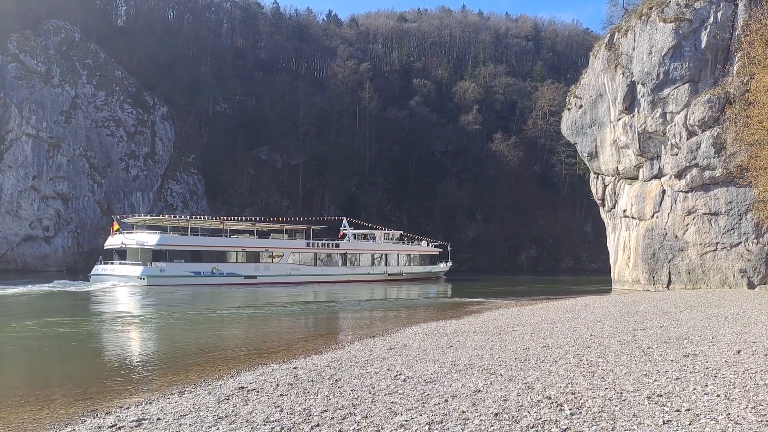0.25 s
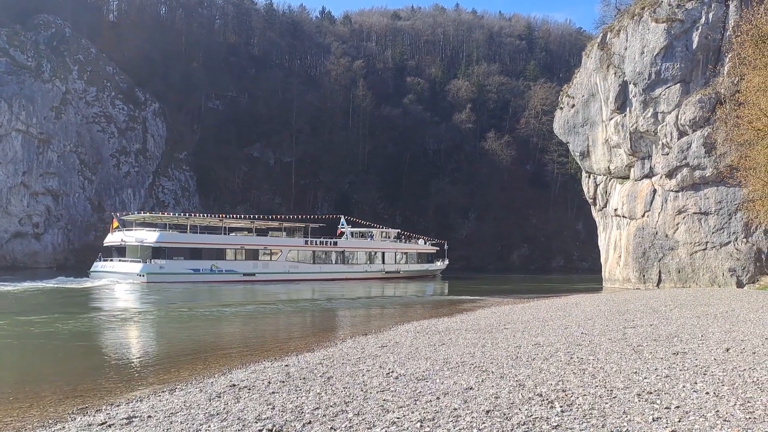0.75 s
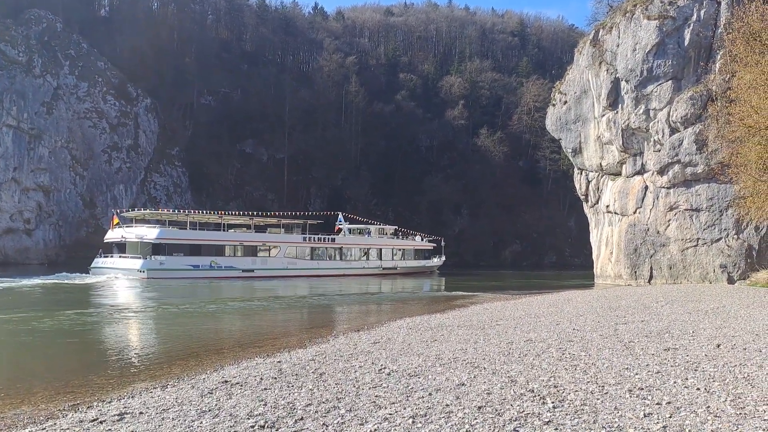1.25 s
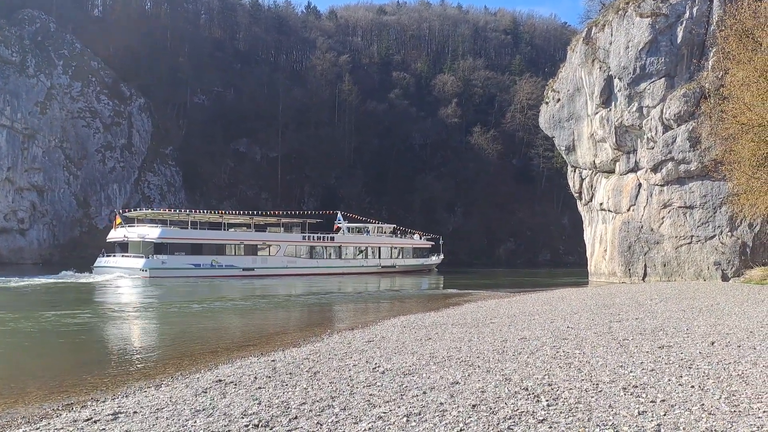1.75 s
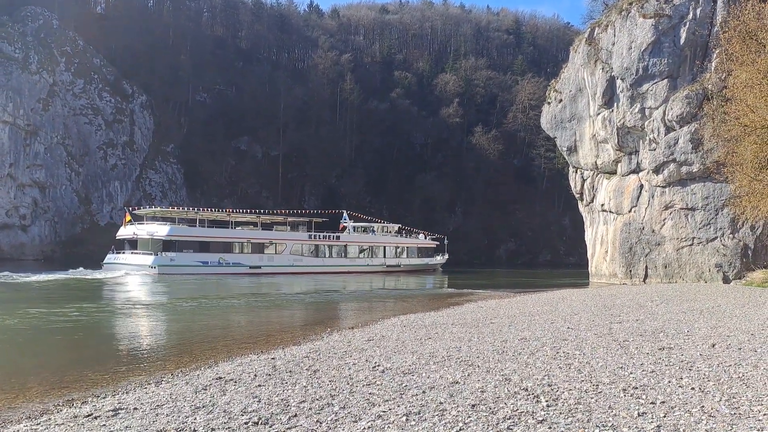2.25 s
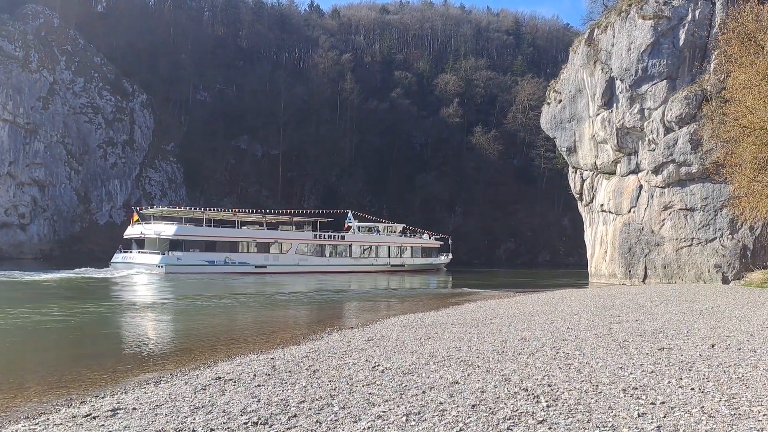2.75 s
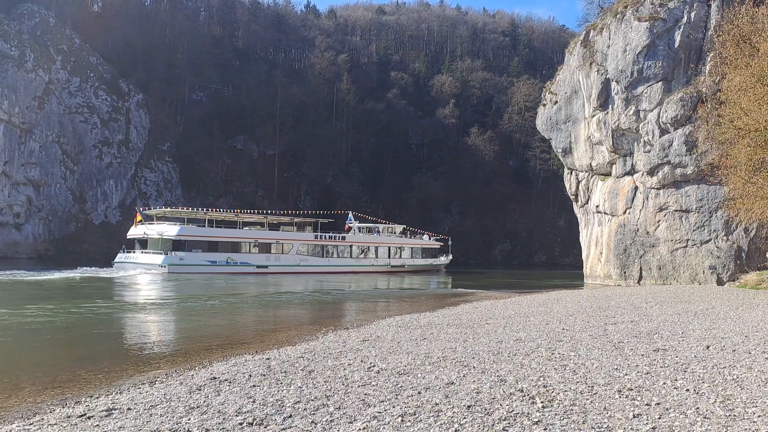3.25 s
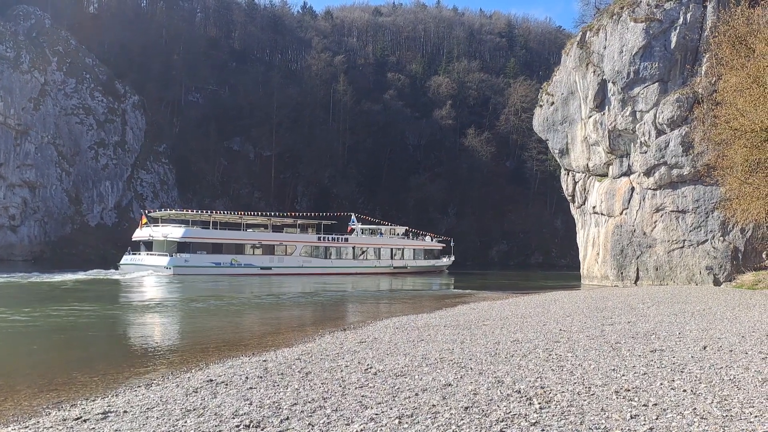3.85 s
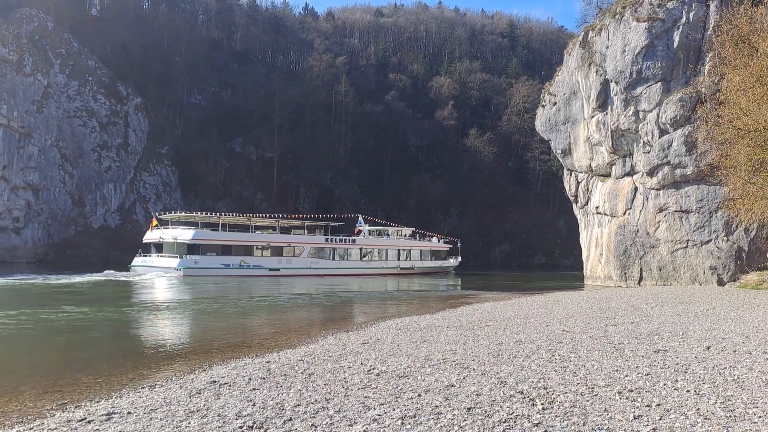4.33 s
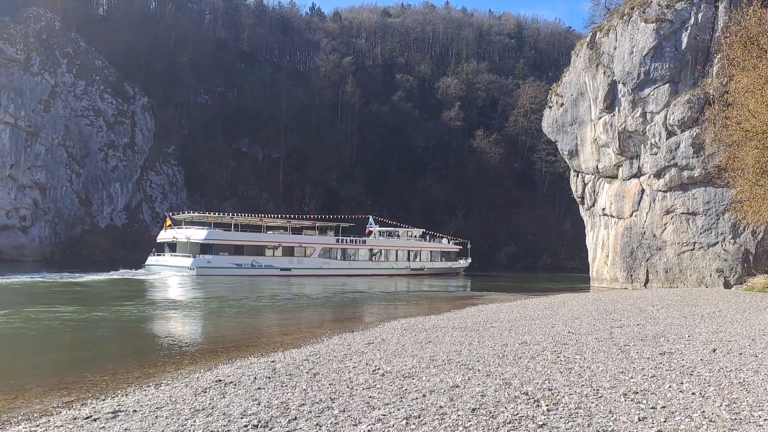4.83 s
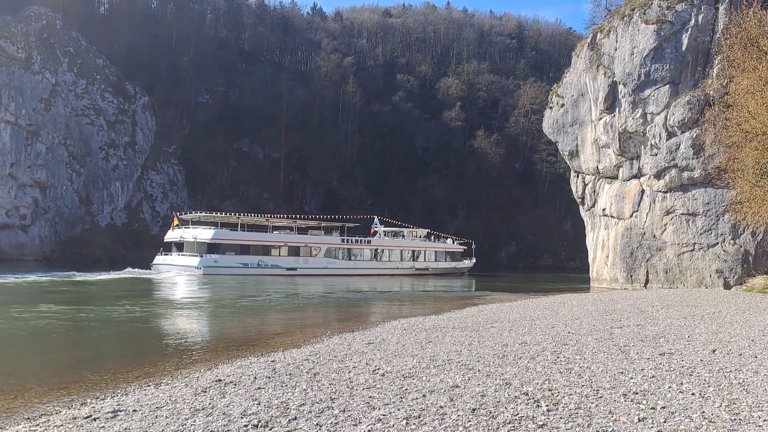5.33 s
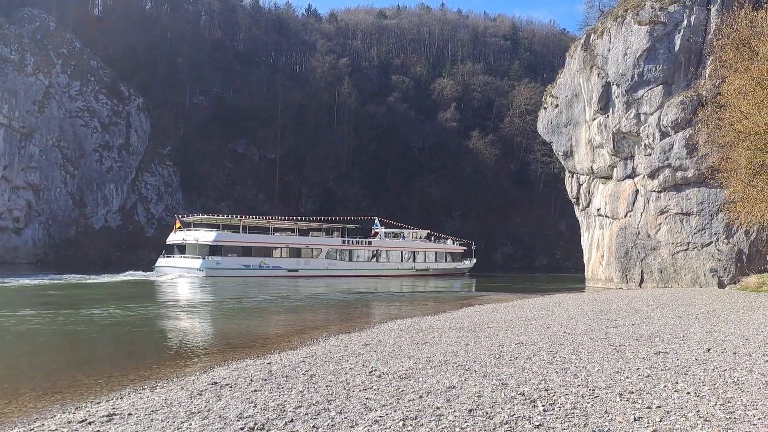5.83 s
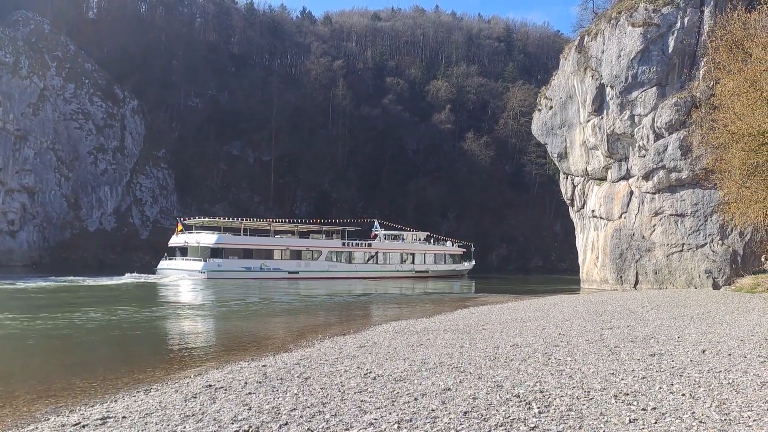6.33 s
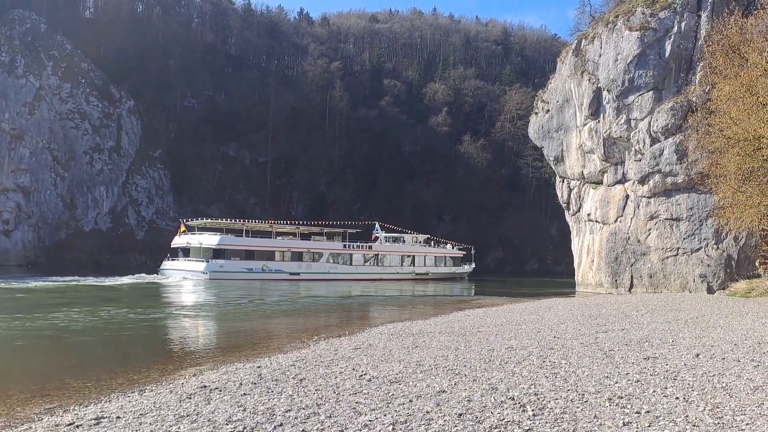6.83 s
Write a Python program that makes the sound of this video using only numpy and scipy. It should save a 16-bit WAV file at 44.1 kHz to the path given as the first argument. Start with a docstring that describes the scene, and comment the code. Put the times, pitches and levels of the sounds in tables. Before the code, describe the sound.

A passenger boat's diesel engines throb low and steady out on a river, over the even rush of propeller wash, heard in stereo from a gravel bank. Close by, stones crunch and click faintly, mostly in the first second. Small birds give thin, high whistles and buzzes, then short chirps, echoing softly off cliffs. The throb grows a little stronger in the second half. A breeze puffs on the microphone over a faint high hiss.

```python
"""A passenger boat's diesels throb along a river gorge, heard in stereo from a gravel bank.
Main engine and generator fire at different rates and beat against each other, straight ahead out on
the water, over the rush of the propeller wash. Small birds call from the wooded cliffs, which echo
them. Close to the microphone, gravel crunches faintly as its stones rub and knock together,
and a breeze puffs. A thin, high hiss lies in the background."""
import sys
import numpy as np
from scipy import signal
from scipy.fft import rfft, irfft
from scipy.io import wavfile

SR = 44100
rng = np.random.default_rng(int(sys.argv[2]) if len(sys.argv) > 2 else 0)


def bounce(signal):
    """Save signal as a 16-bit WAV file at the path given by the first command-line argument."""
    frames = np.transpose(np.atleast_2d(signal))
    limited = np.clip(frames, -1, 1)
    pcm = np.round(limited * 32767).astype(np.int16)
    wavfile.write(sys.argv[1], SR, pcm)


N = 312159
T = np.arange(N) / SR
FREQS = np.maximum(np.arange(N // 2 + 1) * SR / N, 1)


# The main diesel's speed. Each row: time in seconds, firing rate in Hz.
MAIN_SPEED = [(0, 55.2), (1, 55.75), (2, 55.75), (3.2, 55.55), (3.8, 56), (5.2, 56), (5.8, 55.8),
              (7.08, 55.8)]
# The exhausts from the bank. Each row: time in seconds, main diesel and generator levels in dB.
EXHAUST = [(0, -35.5, -34.0), (0.12, -34.5, -31.5), (0.28, -48.0, -32.6), (0.5, -43.0, -30.6),
           (0.8, -36.5, -32.0), (1.1, -36.3, -31.0), (1.55, -32.2, -30.5), (2.3, -34.5, -31.8),
           (3.2, -36.3, -32.8), (3.75, -30.0, -32.5), (4.7, -26.7, -33.0), (5.4, -29.0, -34.0),
           (6.0, -29.8, -33.5), (6.75, -26.9, -31.8), (7.08, -28.0, -33.0)]
# Their overtones. Each row: multiple of the firing rate, level in dB, depth of fading in dB.
MAIN_OVERTONES = [(2.5, -59, 2), (3, -50.3, 1.2), (4, -62, 0.5)]
GENERATOR_OVERTONES = [(2, -61, 3.1), (3, -63.5, 2.1)]
# A hum an octave above the main diesel, across the water. Each row: time in seconds, level in dB.
OCTAVE_HUM = [(0, -41), (.3, -45), (.6, -45), (1.05, -49.5), (1.35, -44), (1.85, -52), (2.1, -44),
              (2.5, -42.5), (2.85, -46), (3.3, -57), (3.9, -46), (4.4, -42), (5.03, -55), (5.25, -46),
              (5.7, -42.5), (6.12, -57), (6.55, -44.5), (7.08, -44)]
# Low rumble of hull and exhaust. Each row: time in seconds, level in dB.
RUMBLE = [(0, -41.5), (1.4, -43.5), (2.8, -42), (4.5, -45.5), (5.4, -40), (6.2, -43), (7.08, -36.5)]
# Its colour at the bank. Each row: frequency in Hz, relative level in dB.
RUMBLE_COLOUR = [(15, -31), (28, -6), (42, -3.5), (60, -0.5), (90, -0.5), (125, -5.5), (190, -8), (245, -7),
                 (330, -14.5), (600, -73)]

def engines(generator_hz=75.02, machine_hz=87.7, machine_db=-52, surge_db=1.3):
    """Out on the river, main diesel and generator beat about 19 times a second over a dull rumble."""
    main_db, generator_db = np.array(curves(EXHAUST)) - dips()
    main_hz = curves(MAIN_SPEED)[0]
    main = diesel(main_hz, main_db, MAIN_OVERTONES, flutter_db=1.1, wander_rad=0.09)
    generator = diesel(np.full(N, generator_hz), generator_db, GENERATOR_OVERTONES,
                       flutter_db=0.2, wander_rad=0.02)
    octave = hum(2 * main_hz, curves(OCTAVE_HUM)[0])
    machinery = hum(np.full(N, machine_hz), machine_db)
    rumble = from_river(RUMBLE_COLOUR) * undb(curves(RUMBLE)[0] + surge_db * walk(2.6))
    return main + generator + dip_bass(octave + machinery + rumble)


def diesel(hz, firing_db, overtones, flutter_db, wander_rad):
    """A muffled exhaust: a strong tone at the firing rate, with weak overtones fading over the water."""
    phase = 2 * np.pi * np.cumsum(hz) / SR
    out = undb(firing_db + flutter_db * walk(23)) * np.cos(phase + wander_rad * walk(5.2))
    for multiple, db, fading_db in overtones:
        drift = 0.044 * walk(6.2) + rng.uniform(0, 2 * np.pi)
        out += undb(db + fading_db * walk(3.4)) * np.cos(multiple * phase + drift)
    return np.sqrt(2) * out


def hum(hz, db):
    """One clean tone from on board, following a pitch curve."""
    return np.sqrt(2) * undb(db) * np.sin(2 * np.pi * np.cumsum(hz) / SR)


# The throb dips briefly at the microphone.
# Each row: centre and half width in seconds, main diesel and generator dips in dB.
DIPS = [(0.2, 0.018, 11.0, 20.0), (0.64, 0.012, 3.0, 11.0), (0.838, 0.012, 9.0, 18.0),
        (0.938, 0.018, 7.0, 10.0), (2.36, 0.016, 6.0, 10.0), (2.79, 0.018, 6.0, 1.5),
        (2.92, 0.018, 5.0, 3.0), (3.1, 0.022, 17.0, 3.5), (3.32, 0.025, 5.0, 3.0), (5.17, 0.04, 8.5, 6.0),
        (5.27, 0.014, 4.0, 2.0), (5.725, 0.018, 7.0, 7.0), (5.845, 0.016, 3.5, 1.0),
        (6.385, 0.015, 4.5, 2.5), (7.02, 0.018, 4.5, 4.0)]

def dips():
    """How far the main diesel and the generator have dipped, in dB, at each moment."""
    return sum(np.outer(depths_db, bump(s, half_width)) for s, half_width, *depths_db in DIPS)


# The bass that dips with the throb. Each row: frequency in Hz, gain in dB.
DIPPING_BASS = [(110, 0), (160, -8), (260, -40)]

def dip_bass(x):
    """The deep part of a sound sinks whenever the throb dips."""
    lost = 1 - undb(-dips().mean(axis=0))
    return x - tint(x, DIPPING_BASS) * lost


# Swells in the boat's drone. Each row: start and length in seconds, pitch in Hz, peak level in dB.
SWELLS = [(0.072, 0.072, 249, -41), (0.687, 0.16, 225, -40), (1.07, 0.085, 160, -41),
          (3.46, 0.14, 221, -42.5), (3.996, 0.12, 212, -41), (5.32, 0.09, 240, -44),
          (5.4, 0.11, 284, -42.5), (5.55, 0.1, 226, -43.5)]

def swells():
    """The drone rises softly on one low note at a time, midway between left and right."""
    out = np.zeros((2, N))
    for s, length, hz, db in SWELLS:
        shape = arch(length)
        add(out, s, undb(db) * shape * np.sin(2 * np.pi * hz * T[:len(shape)]))
    return out


# The wash from the bank. Each row: time in seconds, relative levels of churn and spray in dB.
WASH = [(0, -41.5, -57), (.7, -42.5, -54), (1.5, -42.5, -56), (2.5, -43.5, -57), (3.6, -43.5, -57.5),
        (4.3, -42.5, -57.5), (5.2, -44, -55.5), (6.2, -44, -57.5), (7.08, -44.5, -57.5)]
# Their colours. Each row: frequency in Hz, relative level in dB.
CHURN_COLOUR = [(100, -2.5), (250, -3.5), (320, -2.5), (420, 1), (600, 2.5), (780, -2), (950, -1.5),
                (1200, -4.5), (1550, -6.5), (2000, -13), (3000, -56), (6000, -66)]
SPRAY_COLOUR = [(1200, -17), (2000, 8.5), (2500, 7), (3200, 4.5), (3900, -2), (4600, -6.5), (6000, -13),
                (7400, -8.5), (9000, -44), (12000, -27.5), (16000, -42)]

def wash(churn_gain_db=2.5, spray_gain_db=6.0):
    """The propeller churns water astern, with brighter spray on top; each part surges on its own."""
    churn_db, spray_db = curves(WASH)
    churn = from_river(CHURN_COLOUR) * undb(churn_db + churn_gain_db + 1.17 * walk(31))
    spray = from_river(SPRAY_COLOUR) * undb(spray_db + spray_gain_db + 1.24 * walk(22))
    return churn + spray


# How alike the river is on both sides of the microphone. Each row: frequency in Hz, coherence 0 to 1.
RIVER_COHERENCE = [(50, 0.38), (150, 0.98), (550, 0.94), (1000, 0.77), (1700, 0.4), (3000, 1), (4300, 0.08),
                   (6000, 0), (8000, 0.56), (15000, 0)]
# The river's balance. Each row: frequency in Hz, left minus right in dB.
RIVER_PAN = [(400, 0.1), (1300, -1), (2400, -1.5), (3200, -4), (4200, -1), (5700, 11.5), (7500, 0),
             (10000, -8), (12500, 21), (15500, 0)]

def from_river(colour, lag_s=0.00013):
    """Boat noise: the direct part reaches the left first, the cliffs return the rest from all sides."""
    source, left, right = rfft(rng.standard_normal((3, N)))
    share = np.clip(across(RIVER_COHERENCE), 0, 1)
    direct = np.array([source, source * np.exp(-2j * np.pi * FREQS * lag_s)])
    both = np.sqrt(share) * direct + np.sqrt(1 - share) * np.array([left, right])
    balance = undb(np.outer([1, -1], across(RIVER_PAN)) / 2)
    return unit(irfft(both * balance * undb(across(colour)), N))


def birds():
    """Birds on the wooded cliffs whistle, buzz and chirp, all heard through the gorge."""
    perched = gorge(whistles() + buzzes(), direct_db=-2, branch_db=-8)
    chirping = gorge(chirps(), direct_db=-1.5, branch_db=-7)
    return perched + chirping


# Whistles from open perches. Each row: start and length in seconds, first and last pitch in Hz,
# relative level in dB, left minus right in dB.
WHISTLES = [(1.166, 0.38, 8660, 7450, -67, 0), (1.44, 0.39, 9550, 7830, -65, 3),
            (3.473, 0.26, 9050, 7850, -62, 3), (4.95, 0.3, 9200, 7820, -68, 7),
            (6.615, 0.26, 9100, 8050, -65, 7)]

def whistles(bend=1.6):
    """Long, thin whistles that flutter and almost break as they sink."""
    out = np.zeros((2, N))
    quaver_hz = 28 * walk(146)
    flutter = unit(undb(4.5 * np.minimum(walk(70), 1)))
    for s, length, start_hz, end_hz, db, side_db in WHISTLES:
        call = note(s, length, start_hz, end_hz, 0, bend, quaver_hz, flutter)
        add(out, s, undb(db) * call * pan(side_db))
    return out


# Buzzy calls, a little to the left.
# Each row: start and length in seconds, band centre and width in Hz, relative level in dB.
BUZZES = [(0.56, 0.16, 6900, 900, -65), (1.549, 0.08, 7240, 500, -54.5), (1.55, .12, 9500, 3000, -72),
          (2.425, 0.11, 7250, 500, -56), (2.432, 0.11, 8460, 2800, -59.5), (2.46, 0.13, 4420, 220, -59),
          (3.34, 0.18, 7750, 600, -62.5), (3.55, 0.091, 7850, 500, -62), (3.66, 0.096, 7850, 800, -56.5),
          (3.798, 0.071, 7830, 600, -59), (3.828, 0.22, 8040, 800, -65), (5.2, .28, 13400, 1000, -67),
          (5.93, .1, 9200, 3200, -71)]

def buzzes(flicker_db=3.5):
    """Narrow, rasping bands of birdsong whose level flickers."""
    out, rasp = np.zeros((2, N)), rfft(rng.standard_normal(N))
    for s, length, hz, width, db in BUZZES:
        shape = arch(length)
        band = unit(irfft(rasp / (1 + (2 * (FREQS - hz) / width) ** 2), N))
        call = shape * np.roll(band, -int(s * SR))[:len(shape)]
        add(out, s, undb(db) * call * pan(1.6))
    return out * undb(flicker_db * walk(25))


# Short chirps from the trees. Each row: start and length in seconds, first and last pitch in Hz, relative level
# and swell up to it in dB, bend (1 is a straight slide), left minus right in dB.
CHIRPS = [(4.072, 0.05, 4200, 3500, -56.5, 4, 2.2, 4), (4.13, 0.14, 4200, 4300, -62, 3, 1.5, 10),
          (4.272, 0.06, 6650, 6380, -63.5, 0, 2.5, 4), (4.374, 0.038, 6400, 5280, -53.5, 8, 3.2, 8),
          (4.41, 0.095, 5320, 5330, -66, 0, 1, 4), (4.452, 0.042, 4700, 3880, -54.5, 7, 2.2, 13),
          (4.507, 0.038, 4150, 3180, -48.5, 5, 1.7, 0), (4.88, 0.034, 5900, 4380, -58, 6, 1.6, 5),
          (4.945, 0.04, 4450, 4080, -59, 2, 2, 5), (5.175, 0.055, 3380, 3290, -54.5, 2, 2, 5),
          (5.25, 0.036, 3920, 3960, -53, 2, 2, 2), (5.39, 0.09, 3050, 2900, -55.5, 4, 1.7, 6),
          (5.555, 0.13, 3700, 4380, -54, 13, 1.9, 10), (5.945, 0.032, 4600, 4380, -59, 2, 2, 3),
          (5.988, 0.03, 4050, 3780, -62, 0, 1.5, 8), (6.644, 0.032, 5300, 3720, -52, 5, 1.9, 6),
          (6.817, 0.044, 4300, 3720, -52, 3, 2, 7)]

def chirps():
    """Short, slightly hoarse notes, most of them hooked downwards."""
    out = np.zeros((2, N))
    quaver_hz = 30 * walk(300)
    flutter = unit(undb(2.0 * np.minimum(walk(150), 1)))
    for s, length, start_hz, end_hz, db, swell_db, bend, side_db in CHIRPS:
        call = note(s, length, start_hz, end_hz, swell_db, bend, quaver_hz, flutter)
        add(out, s, undb(db) * call * pan(side_db))
    return out


def note(s, length, start_hz, end_hz, swell_db, bend, quaver_hz, flutter):
    """One bird note slides to its last pitch, swelling by swell_db on the way."""
    shape = arch(length)
    span = slice(int(s * SR), int(s * SR) + len(shape))
    remaining = np.linspace(1, 0, len(shape))
    hz = end_hz + (start_hz - end_hz) * remaining ** bend + quaver_hz[span]
    envelope = shape * flutter[span] * undb(-swell_db * remaining)
    return np.sqrt(2) * envelope * np.sin(2 * np.pi * np.cumsum(hz) / SR)


def gorge(x, direct_db, branch_db, blur_s=0.007, echo_s=0.075, smear_s=0.02, t60_s=0.81):
    """Branches blur a call at once, the cliff returns a smeared echo, and a soft stereo tail follows."""
    age = T[:SR]
    tail = rng.standard_normal((2, SR)) * np.exp(-np.log(1000) * age / t60_s)
    tail *= 1 - np.exp(-age / 0.0063)
    echo = rng.standard_normal((2, SR)) * (age > echo_s) * np.exp(-abs(age - echo_s) / smear_s)
    branches = stereo_noise(0.5, SR) * np.exp(-age / blur_s)
    response = undb(branch_db) * unit(branches) + undb(-10) * unit(echo) + undb(-6) * unit(tail)
    return undb(direct_db) * x + signal.fftconvolve(x, response / np.sqrt(SR), axes=1)[:, :N]


# Stones grinding under weight, close by. Each row: time in seconds, level in dB.
GRIND = [(0, -59), (.55, -61), (.66, -56.5), (.78, -57), (.865, -55), (.92, -59), (1.0, -57.5), (1.1, -60),
         (1.35, -58.5), (1.9, -62), (2.5, -64), (4, -65), (7.08, -73)]
# The bright crunch and the duller grinding. Each row: frequency in Hz, relative level in dB.
CRUNCH_COLOUR = [(1500, -12), (2500, 5), (3500, 7.5), (4700, -11), (6000, -1.5), (7600, 4), (9500, 0.5),
                 (12000, -0.5), (14000, -1), (16000, -6)]
GRIND_COLOUR = [(1800, -38), (2800, -8), (3400, 3.5), (3900, 0), (4500, -9.5), (6500, -32), (12000, -31)]

def gravel(grains_per_s=1100, rubs_per_s=420):
    """Near the microphone, to the left, tiny stone contacts crunch and clink over a duller grinding."""
    crunch = undb(-3) * unit(tint(contacts(grains_per_s) * stereo_noise(0.76), CRUNCH_COLOUR))
    clinking = undb(-1) * unit(tint(clinks(), CRUNCH_COLOUR))
    grind = unit(tint(contacts(rubs_per_s) * stereo_noise(0.19), GRIND_COLOUR))
    return ((crunch + clinking) * shifting() + grind * undb(curves(GRIND)[0])) * pan(3.5)


def contacts(per_s, decay_s=0.0034):
    """The envelope of stones touching at random, each touch dying away quickly."""
    touches = rng.random(N) < per_s / SR
    power = signal.lfilter([1], [1, -np.exp(-2 / (decay_s * SR))], touches)
    return unit(np.sqrt(power + 1e-12))


def clinks(per_s=2200, spread_db=3.0, ring_s=0.0006, pitches=28):
    """Small stones knock together at random, each ringing for an instant at its own pitch."""
    out = np.zeros((2, N))
    count = int(per_s * N / SR / pitches)
    decay = np.exp(-1 / (ring_s * SR))
    for hz in np.linspace(2000, 15500, pitches):
        sizes = undb(spread_db * np.minimum(rng.exponential(size=count), 4)) * rng.choice([-1, 1], count)
        hits = np.zeros((2, N))
        hits[:, rng.integers(0, N, count)] = sizes * (1 + 0.38 * rng.standard_normal((2, count)))
        angle = 2 * np.pi * hz / SR
        out += signal.lfilter([np.sin(angle)], [1, -2 * decay * np.cos(angle), decay ** 2], hits)
    return unit(out)


# The gravel shifts close by. Each row: start and hold in seconds, relative level in dB.
SHIFTS = [(0.567, 0.27, -57), (0.942, .02, -59), (1.478, .1, -65), (2.42, 0.096, -67), (2.656, 0.14, -65),
          (3.08, .06, -68), (3.43, 0.056, -61), (4.44, 0.22, -66), (4.68, 0.27, -63.5), (4.998, .06, -60.5),
          (5.22, 0.3, -64), (6.48, 0.26, -71)]

def shifting(attack_s=0.028, settle_s=0.14, creep_db=-63, fade_db_per_s=3.5):
    """How hard the gravel moves: each shift builds, holds and settles, over a fading creep."""
    power = undb(creep_db - fade_db_per_s * T) ** 2
    for s, hold, db in SHIFTS:
        rise = np.clip((T - s) / attack_s, 0, 1)
        settle = np.exp(-np.maximum(T - s - attack_s - hold, 0) / settle_s)
        power += (undb(db) * rise * settle) ** 2
    return np.sqrt(power)


# Single pebbles near the microphone.
# Each row: start in seconds, relative level in dB, ring in Hz, left minus right in dB.
PEBBLES = [(0.0498, -41, 7500, -3), (0.559, -41, 6540, 8), (0.614, -41, 7000, 2), (0.6743, -35, 6500, 2),
           (0.704, -42, 5600, 3), (0.714, -41, 9000, 3), (0.727, -37, 6400, 3), (0.7617, -46, 8300, 3),
           (0.816, -37, 11200, 3), (0.855, -33, 11800, 8), (0.885, -42, 6000, 3), (0.9738, -42, 8000, 3),
           (1.026, -44, 8500, 3), (1.1084, -43, 11500, 3), (2.197, -41, 6600, 1), (2.5446, -39, 10600, 10),
           (2.5915, -42, 12000, 9), (2.9562, -44, 8460, 13), (3.485, -33, 7000, 7), (3.6576, -43, 13000, 6),
           (4.209, -48, 9000, 3), (4.4598, -49, 9000, 10), (4.601, -36.5, 7550, 6), (5.9694, -42, 8000, 3),
           (6.116, -43, 9500, 3), (6.1374, -44, 12500, 4), (6.3804, -44, 13500, 5),
           (6.4622, -43, 13500, 10), (6.7601, -44, 7000, 8)]

def pebbles(decay_s=0.0011, ticks_per_s=18):
    """Now and then a pebble clicks and rings at its own pitch; small grit ticks faintly in between."""
    age, clicks = T[:800], np.zeros((2, N))
    for s, db, hz, side_db in PEBBLES:
        click = rng.standard_normal(len(age)) + 0.83 * np.sin(2 * np.pi * hz * age)
        add(clicks, s, click * np.exp(-age / decay_s) * undb(db - 10.5) * pan(side_db))
    clicks = tint(clicks, [(1500, -15), (3500, 2), (7500, 3.5), (12000, 3), (16000, 3)])
    hits = (rng.random(N) < ticks_per_s / SR) * undb(-53.5 - 9 * rng.random(N))
    ticks = signal.lfilter([1], [1, -np.exp(-1 / (decay_s * SR))], hits) * stereo_noise(0.7)
    return clicks + tint(ticks, [(6000, -18), (11000, 2), (16000, 0)]) * pan(4)


# A larger stone on the bank. Each row: start in seconds, peak level in dB, ring in Hz.
KNOCKS = [(6.049, -32, 620)]

def knocks(ring_s=0.007):
    """A larger stone settles with a short, dull knock."""
    out, age = np.zeros((2, N)), T[:2048]
    for s, db, hz in KNOCKS:
        add(out, s, undb(db) * np.exp(-age / ring_s) * np.sin(2 * np.pi * hz * age))
    return out


# The breeze on the microphone, and its strongest gusts. Each row: time in seconds, relative level in dB.
BREEZE = [(0, -51), (1.5, -47), (4.3, -55), (5.6, -49), (7.08, -47.5)]
GUSTS = [(.63, -42), (1.34, -41), (3.3, -42), (5.19, -42), (6.12, -42), (6.71, -41.5), (6.9, -44)]
# Its eddies. Each row: frequency in Hz, relative level in dB.
EDDY_COLOUR = [(8, -27), (24, -15), (36, -8), (58, 1), (85, -7.5), (115, -9), (160, -18.5), (250, -26),
               (450, -29), (900, -73)]

def wind(gain_db=5.5, puff_db=3.5):
    """Each side of the microphone has its own eddies; strong gusts shed smaller ones that sound higher."""
    breeze = undb(curves(BREEZE)[0] + puff_db * walk(4))
    gusts = sum(undb(db) * bump(s, half_width=0.048) for s, db in GUSTS)
    strength_db = 20 * np.log10(np.hypot(breeze, gusts))
    eddies = unit(tint(rng.standard_normal((2, N)), EDDY_COLOUR))
    flurry_colour = [(40, -18), (130, 15), (260, -12), (400, -12), (900, -53)]
    flurries = unit(tint(rng.standard_normal((2, N)), flurry_colour))
    flurry_db = -25 + 0.36 * (strength_db - strength_db.mean())
    return undb(strength_db + gain_db) * (eddies + flurries * undb(flurry_db))


# The background hiss. Each row: frequency in Hz, relative level in dB.
HISS_COLOUR = [(3000, -35), (5000, 7), (6200, -8.5), (7400, 2), (8300, 1.5), (9400, -0.5), (12000, -5),
               (16000, -11)]

def hiss(db=-67):
    """A thin, even, high hiss in the background."""
    noise = unit(tint(stereo_noise(0.093), HISS_COLOUR))
    return noise * undb(db + 0.5 * walk(10)) * pan(1)


def undb(db):
    """Decibels to gain."""
    return 10 ** (np.asarray(db) / 20)


def unit(x):
    """Scale to rms 1."""
    return x / np.sqrt(np.mean(x ** 2))


def curves(table):
    """The columns of a time table, one value a sample."""
    s, *columns = np.transpose(table)
    return [np.interp(T, s, column) for column in columns]


def across(points):
    """A table over frequency, read at every bin on a log axis."""
    hz, value = np.transpose(points)
    return np.interp(np.log(FREQS), np.log(hz), value)


def tint(x, colour):
    """Filter by a (Hz, dB) colour."""
    return irfft(rfft(x) * undb(across(colour)), N)


def walk(rate, size=16384):
    """A smooth random curve with rms 1, changing about rate times a second."""
    hz = np.arange(size // 2 + 1) * SR / N
    slow = irfft(rfft(rng.standard_normal(size)) / (1 + (hz / rate) ** 4))
    return unit(np.interp(np.linspace(0, size - 1, N), np.arange(size), slow))


def stereo_noise(width, size=N):
    """Noise common to both sides, widened by some of each side's own."""
    return rng.standard_normal(size) + width * rng.standard_normal((2, size))


def pan(db):
    """Left and right gains for a level difference."""
    return undb(np.array([[db], [-db]]) / 2)


def add(out, s, sound):
    """Mix a sound in at time s."""
    i = max(int(s * SR), 0)
    out[:, i:i + sound.shape[-1]] += sound[..., :N - i]


def arch(length):
    """A soft rise and fall."""
    return signal.windows.tukey(max(int(length * SR), 16), .5)


def bump(s, half_width):
    """A bell-shaped swell of height 1 around time s."""
    return np.exp(-.5 * ((T - s) / half_width) ** 2)


def scene():
    """The boat on the river, birds on the cliffs, stones on the bank, a faint hiss and a breeze."""
    boat = engines() + swells() + wash()
    bank = gravel() + pebbles() + knocks()
    return boat + bank + hiss() + birds() + dip_bass(wind())


def record(dry, top_hz=15750):
    """The recorder cuts the highest treble steeply."""
    return signal.sosfilt(signal.ellip(10, .1, 80, top_hz, fs=SR, output="sos"), dry)


dry = scene()
out = record(dry)
bounce(out)
```